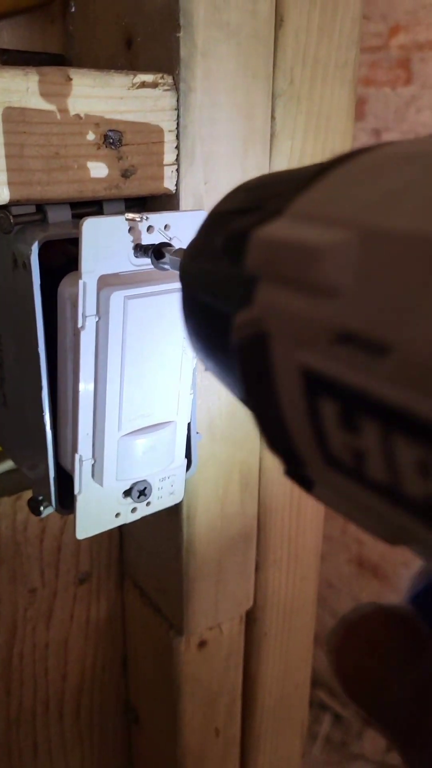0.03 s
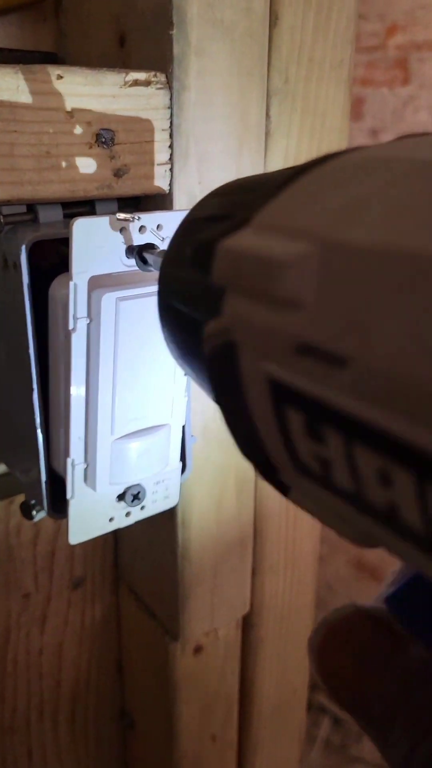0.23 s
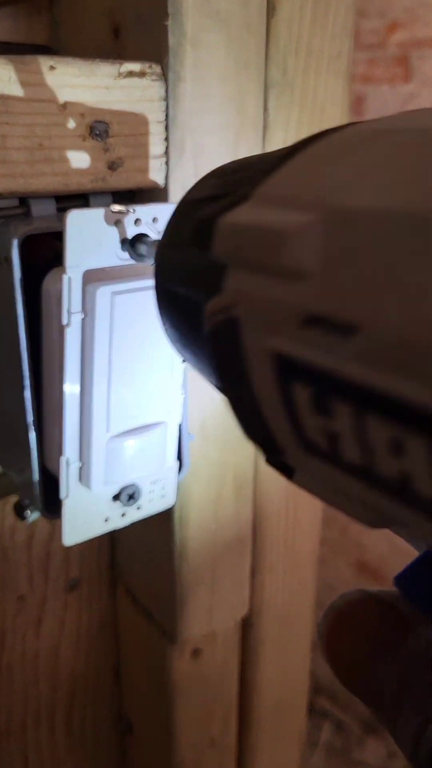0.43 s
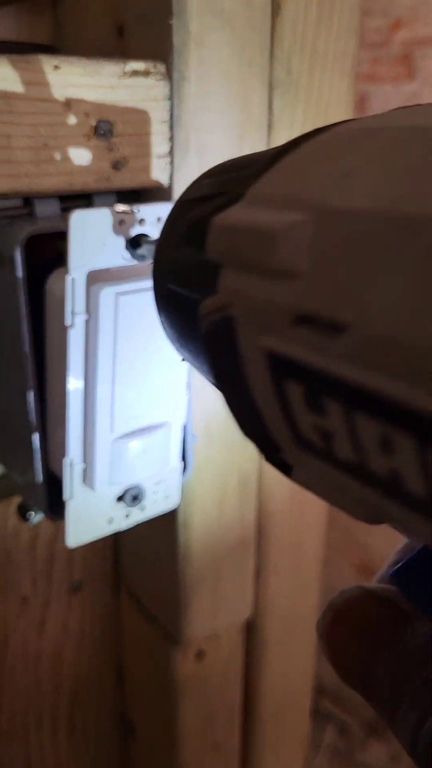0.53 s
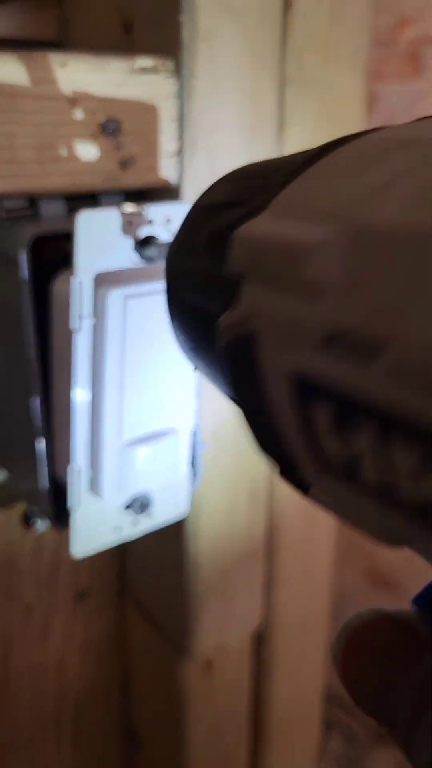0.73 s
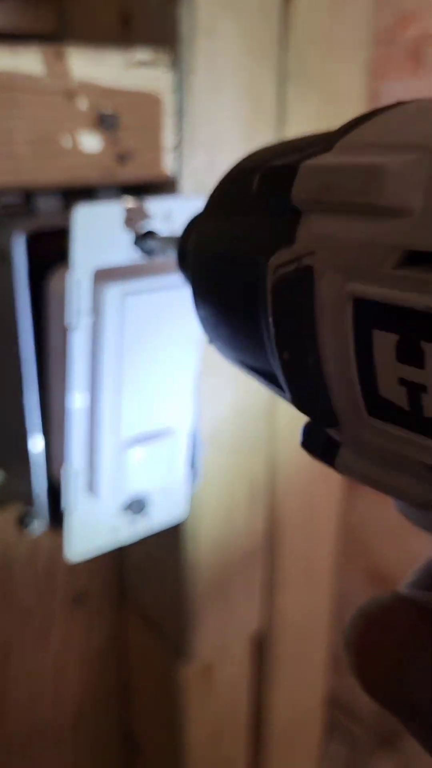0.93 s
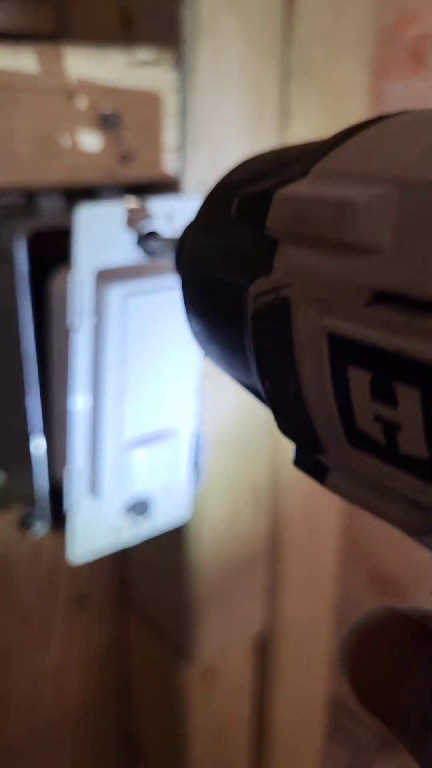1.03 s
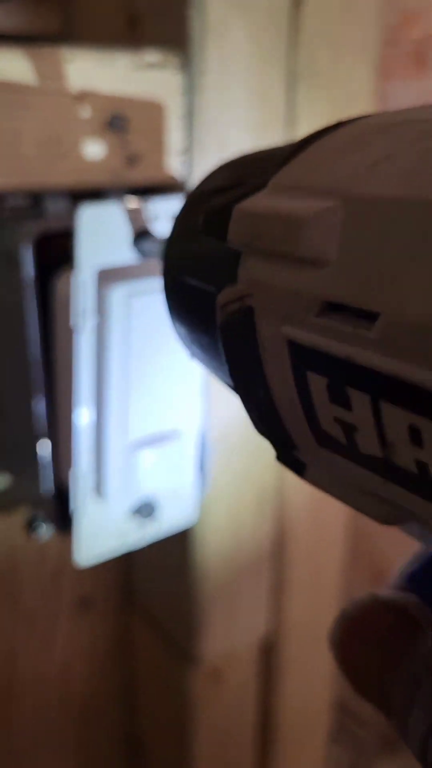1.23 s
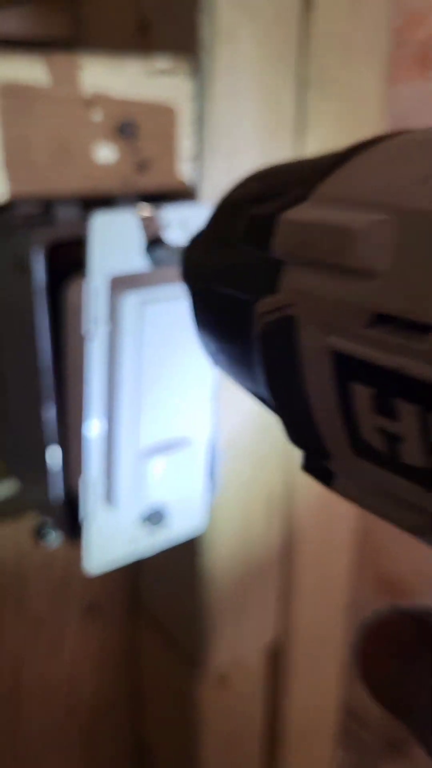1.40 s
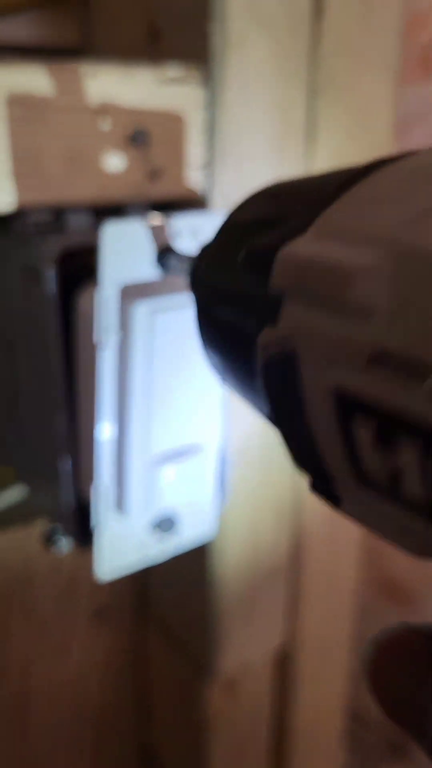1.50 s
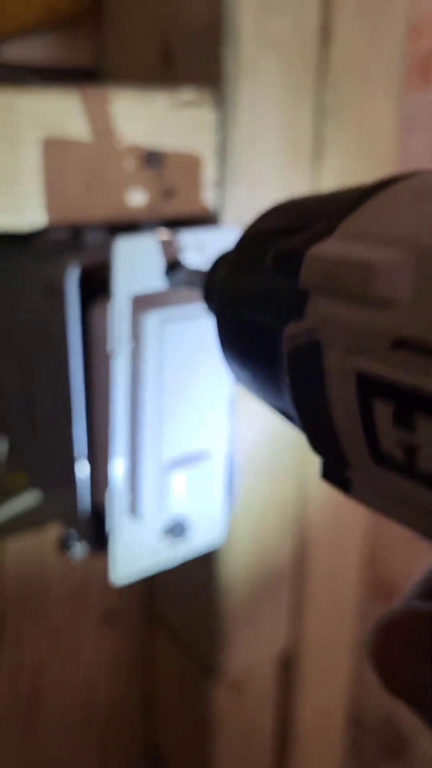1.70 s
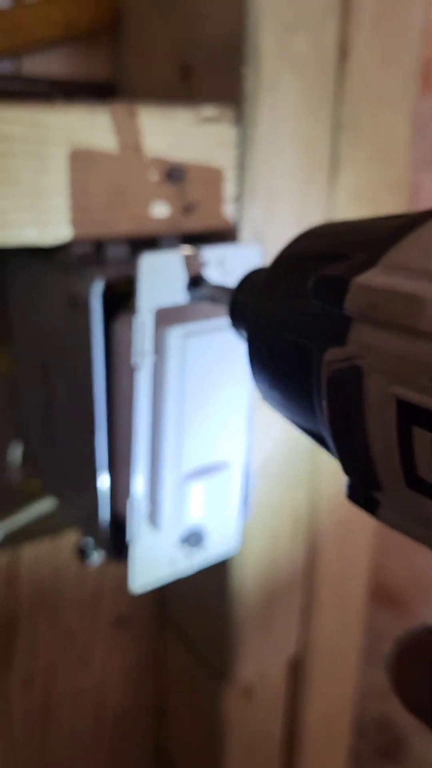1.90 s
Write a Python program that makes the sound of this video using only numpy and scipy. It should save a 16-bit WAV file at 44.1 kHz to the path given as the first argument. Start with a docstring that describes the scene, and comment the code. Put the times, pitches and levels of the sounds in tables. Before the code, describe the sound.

Close cordless drill nudging a screw in brief spurts, clacking and ticking in a timber room.

```python
"""A cordless drill nudges a screw into a wall box, up close in a bare timber room.
On a squeeze of the trigger the speed controller whines, the gears tick through their slack, the spindle
takes hold with a clack, and the motor rasps up to speed and brakes. Some squeezes stop at the clack.
The timber wall answers with dull thuds, and the house rumbles faintly underneath."""
import sys
import numpy as np
from scipy import signal
from scipy.fft import rfft, irfft, next_fast_len
from scipy.io import wavfile
from scipy.ndimage import uniform_filter1d, minimum_filter1d, map_coordinates

SR = 44100
rng = np.random.default_rng(int(sys.argv[2]) if len(sys.argv) > 2 else 0)


def wav_record(signal):
    """Record a signal, one row per channel, as 16-bit PCM in the file named by sys.argv[1]."""
    frames = np.transpose(np.atleast_2d(signal))
    bounded = np.clip(frames, -1, 1)
    # unit amplitude maps onto the largest positive 16-bit level
    quanta = np.round(bounded * 32767).astype(np.int16)
    wavfile.write(sys.argv[1], SR, quanta)


N = 85995


def motor():
    """The motor spins up and brakes: gears knock and grind, the bit rings, the brake jolts the wall."""
    # motor runs: start t/s, top speed t/s, stop t/s, gear pulse rate at the start f/Hz, at the top f/Hz
    runs = [(.160, .257, .294, 120, 726), (.443, .521, .552, 180, 608), (1.112, 1.233, 1.280, 185, 860),
            (1.548, 1.666, 1.707, 145, 572)]
    # loudness of the motor's rasp through each run: t/s, level/dB
    levels = [
        [(.160, -31.5), (.190, -17), (.201, -9), (.236, -20), (.246, -14), (.282, -16.5), (.294, -28.5)],
        [(.443, -23.5), (.468, -22.5), (.502, -16), (.519, -22), (.538, -26.5), (.552, -34)],
        [(1.112, -29), (1.140, -22.5), (1.190, -18), (1.245, -19), (1.262, -28), (1.280, -41.5)],
        [(1.548, -33.5), (1.580, -31), (1.594, -23.5), (1.645, -17.5), (1.688, -22.5), (1.707, -27.5)],
    ]
    # ring of the bit, which seats differently in each run: f/Hz, level/dB
    bit_rings = [(3050, -11), (3030, -9), (4500, -6.5), (2650, -12)]
    # tone colour of the gearbox: f/Hz, level/dB
    gearbox = [(100, -35.5), (350, -14), (620, -20.5), (820, -7), (1080, -3), (1330, -10), (1520, -3),
               (1750, -8.5), (2300, -3), (2900, -4.5), (3500, -3), (4200, -10), (4900, -8.5), (5600, -14),
               (7200, -16.5), (9000, -21.5), (11000, -28.5), (15000, -24.5)]
    stall_hz, grind_db, tilt_db_per_octave = 130, -7, 1.2
    out, jolts, t = np.zeros(N), np.zeros(N), np.arange(N) / SR
    hiss = filtered(rng.standard_normal(N), lambda f: amp(tilt_db_per_octave * np.log2((f + 100) / 3000)))
    for (start, top, stop, start_hz, top_hz), level, (bit_hz, bit_db) in zip(runs, levels, bit_rings):
        running = (t >= start) & (t < stop)
        now = t[running]
        run_up = np.maximum((top - now) / (top - start), 0) ** 1.5
        braking = np.maximum((now - top) / (stop - top), 0) ** 1.8
        pulse_hz = top_hz - (top_hz - start_hz) * run_up - (top_hz - stall_hz) * braking
        cycles = np.cumsum(pulse_hz) / SR
        # sliding teeth: one fading puff of hiss a cycle, louder with speed
        grind = hiss[running] * unit(np.exp(-1.8 * (cycles % 1))) * (pulse_hz / top_hz)
        gears = gear_knocks(cycles, pulse_hz) + amp(grind_db) * grind
        bit = amp(bit_db) * signal.lfilter(*signal.iirpeak(bit_hz, Q=2, fs=SR), gears)
        add(out, start, (gears + bit) * amp(np.interp(now, *np.transpose(level))))
        add(jolts, (top + stop) / 2, amp(-39) * wall_thud(hz=162, t60=0.34, rise_s=0.016))
    rasp = flicker(coloured(out, gearbox))
    return in_room(rasp, room_db=-13, near_db=-1, paths=7) + jolts


def gear_knocks(cycles, pulse_hz, swing=.17, scatter_db=2.6, jitter_s=.000016):
    """Teeth strike once a cycle, every other knock stronger, each a little off in size and time."""
    k = np.arange(1, int(cycles[-1]) + 1)
    samples = np.arange(len(cycles))
    chance = rng.standard_normal((len(k), 2))
    strikes = np.interp(k, cycles, samples) + jitter_s * SR * chance[:, 0]
    size = (1 + swing * (-1) ** k) * amp(scatter_db * chance[:, 1])
    knocks = size @ np.sinc(samples - strikes[:, None]) * np.sqrt(SR / pulse_hz)
    return signal.lfilter(*signal.butter(1, 1210, "high", fs=SR), knocks)  # small teeth radiate few lows


def flicker(x, depth_db=3.5, patch_hz=500, patch_s=.014):
    """Each gear tone swells and fades on its own, in short patches."""
    hz, s, spectra = signal.stft(x, SR, nperseg=256)
    knots = rng.standard_normal((int(hz[-1] / patch_hz) + 2, int(s[-1] / patch_s) + 2))
    grid = np.meshgrid(hz / patch_hz, s / patch_s, indexing="ij")
    gain = amp(depth_db * map_coordinates(knots, grid))
    return signal.istft(spectra * unit(gain), SR, nperseg=256)[1][:N]


def spindle_clacks(hold_s=0.0026, snap_db=-1, snap_t60=0.0088, thud_db=-9.5):
    """The spindle slams home: a bright snap, steel clatter, the housing's ring and a thud in the wall."""
    # clacks: t/s, level/dB, ring level/dB, room level/dB, ring tuning/ratio, clatter t60/s
    hits = [(-.030, -19.5, -9, -1, 0.9, 0.075), (.158, -20.5, -5.5, -2.5, 0.98, 0.19),
            (.440, -22.5, -8.5, -0.5, 0.96, 0.23), (.787, -21, -6.5, -3.5, 1, 0.14),
            (1.1098, -22, -5, -2, .98, .11), (1.540, -21.5, -1, -2, 1, 0.03)]
    # tone colour of the steel clatter: f/Hz, level/dB
    steel = [(80, -20.5), (220, -8.5), (550, -10), (850, -3.5), (1500, -6.5), (2200, -3), (4600, -3),
             (6000, -9), (7700, -6.5), (10000, -14), (15000, -10)]
    # housing modes, before each clack's tuning: f/Hz, level/dB, t60/s
    housing = [(815.7, 2, 0.088), (2071, 9.5, 0.023), (2288, 11, 0.023), (3423, 15.5, .02),
               (4637, 4, 0.023), (7820, 3.5, 0.018)]
    out, t = np.zeros((2, N)), np.arange(N) / SR
    for s, db, ring_db, room_db, tuning, clatter_t60 in hits:
        decay = amp(-60 * np.maximum(t - hold_s, 0) / clatter_t60)
        clatter = coloured(rng.standard_normal(N) * decay, steel)
        snap = np.diff(rng.standard_normal(N + 1)) * amp(snap_db - 60 * t / snap_t60)
        ring = sum(amp(level - 60 * t / t60) * np.sin(2 * np.pi * hz * tuning * t)
                   for hz, level, t60 in housing)
        ring *= 1 - np.exp(-t / 0.0005)
        wall = amp(room_db + thud_db) * wall_thud(hz=205, t60=0.37, rise_s=0.04)
        clack = in_room(snap + clatter + amp(ring_db) * ring, room_db, near_db=0)
        add(out, s, amp(db) * (clack + wall))
    return out


def gear_ticks():
    """Teeth and bit tick through their slack."""
    # ticks: t/s, level/dB
    hits = [(.138, -15), (.149, -8), (.291, -10.5), (.3285, -17), (.342, -20), (.3975, -4.5), (.413, -14),
            (.4207, -8.5), (.4273, -5.5), (.4332, -8), (.7222, -22.5), (.7367, -22.5), (.7513, -17.5),
            (.7697, -20), (1.087, -25), (1.097, -14.5), (1.105, -8.5), (1.495, -26.5), (1.5116, -19),
            (1.526, -21), (1.747, -17.5)]
    # tone colour of a tick: f/Hz, level/dB
    colour = [(150, -14), (550, -14.5), (850, -7.5), (1800, -8), (3000, -2), (3900, -6.5), (5000, -5.5),
              (7000, -22), (10000, -34), (16000, -40)]
    return contacts(hits, colour)


def trigger_clicks():
    """The trigger switch clicks under the finger."""
    # clicks: t/s, level/dB
    hits = [(.112, -20), (1.059, -32.5), (1.437, -37)]
    # tone colour of the switch: f/Hz, level/dB
    colour = [(200, -14.5), (900, -6), (2000, -7), (6000, -8), (9000, -23), (15000, -19.5)]
    return contacts(hits, colour)


def contacts(hits, colour, rattle_db=-10.5, rattle_t60=0.0043, bright_above_db=-13):
    """Small hard contacts, each with a short rattle behind it; the hardest hits are brighter."""
    out, t = np.zeros(N), np.arange(SR // 30) / SR
    centre = len(t) // 2
    octaves = np.log2(np.clip(np.fft.rfftfreq(len(t), 1 / SR), 500, 6000) / 3000)
    for s, db in hits:
        rattle = amp(rattle_db - 60 * t / rattle_t60) * rng.standard_normal(len(t))
        contact = np.roll((t == 0) + rattle, centre)
        tilt_db_per_octave = 0.16 * max(db - bright_above_db, 0)
        add(out, s - t[centre], amp(db) * irfft(rfft(contact) * amp(tilt_db_per_octave * octaves)))
    return in_room(coloured(out, colour), room_db=-11, near_db=-6, paths=3)


def controller_whine(hz=6010, octave_db=-9, waver_db=3.5, waver_hz=160, slip_rad=.7):
    """The switched current sings unsteadily in the stalled motor until it breaks loose."""
    # whines: start t/s, end t/s, level/dB
    whines = [(0.115, 0.164, -43), (0.378, 0.445, -46), (0.694, .790, -49), (1.07, 1.116, -49),
              (1.471, 1.542, -54.5)]
    t = np.arange(N) / SR
    gates = sum(amp(db) * ((t > start) & (t < end)) for start, end, db in whines)
    stereo_phase = np.array([[0], [np.pi / 2]])
    phase = 2 * np.pi * hz * t + slip_rad * wobble(waver_hz) + stereo_phase
    tone = np.sin(phase) + amp(octave_db) * np.sin(2 * phase)
    return uniform_filter1d(gates, size=180) * tone * amp(waver_db * wobble(waver_hz))


def wall_thud(hz, t60, rise_s):
    """The timber wall booms: a low band of noise that swells and dies away."""
    t = np.arange(N) / SR
    boom = unit(filtered(rng.standard_normal(N), lambda f: 1 / (1 + (2.1 * np.log((f + 1) / hz)) ** 4)))
    return boom * amp(-60 * t / t60) * (1 - np.exp(-t / rise_s))


def in_room(x, room_db, near_db, paths=1, shift_s=.017, near_t60=0.026):
    """Direct sound, scatter off nearby studs and room tail; several paths crossfade as the chuck turns."""
    # phase lead of the left channel: f/Hz, lead/rad
    lead = [(100, -2), (1200, 0.23), (2410, 3.5), (2840, -0.7), (4220, -5.5), (5940, -9.5), (7750, 4.5),
            (11400, 18.5), (16500, 21.5)]
    # stereo balance, left minus right: f/Hz, level/dB
    pan = [(80, 0), (140, -5.5), (210, 7.5), (330, -12), (500, -8), (770, 6.5), (1170, 0.5), (1790, -6),
           (2740, -8), (4190, -4.5), (6410, 8), (9810, -1.5), (15000, -1)]
    # decay of the timber room: f/Hz, t60/s
    room_decay = [(150, 0.39), (450, 0.58), (850, 0.36), (1300, 0.39), (4500, 0.28), (8000, 0.3),
                  (15000, 0.16)]
    t, sides = np.arange(SR // 20) / SR, np.array([[1], [-1]])
    scatter, room = 0, 0
    for k in range(paths):
        away = abs((np.arange(N) / SR / shift_s - k + paths / 2) % paths - paths / 2)
        part = x * np.cos(np.pi / 2 * np.minimum(away, 1)) if paths > 1 else x
        studs = rng.standard_normal((2, len(t))) * amp(-60 * t / near_t60) * (1 - np.exp(-t * 2000))
        hz, s, noise = signal.stft(rng.standard_normal((2, SR // 2)), SR, nperseg=256)
        tail = signal.istft(noise * amp(-60 * s / along(room_decay, hz)[:, None]), SR, nperseg=256)[1]
        scatter += echo(part, studs)
        room += echo(part, tail)
    direct = filtered(x, lambda f: np.exp(.5j * along(lead, f) * sides))
    close = filtered(direct + amp(near_db) * scatter, lambda f: amp(sides * along(pan, f) / 2))
    return close + amp(room_db) * room


def house_rumble(level_db=-55.5, side_db=-11):
    """Low rumble of the house, nearly the same on both sides."""
    # tone colour of the rumble: f/Hz, level/dB
    colour = [(20, -25), (40, -2), (54, 7.5), (75, -15.5), (100, 2.5), (125, -8.5), (300, -22.5),
              (1000, -31), (3000, -30.5), (8000, -53), (16000, -44.5)]
    mid, side = (coloured(rng.standard_normal(N), colour) for _ in range(2))
    return amp(level_db) * (mid + amp(side_db) * np.array([side, -side]))


def amp(db):
    """Decibels to gain."""
    return 10 ** (np.asarray(db) / 20)


def unit(x):
    """Scale to rms 1."""
    return x / np.sqrt(np.mean(x ** 2) + 1e-20)


def along(points, hz):
    """Read a curve of (f/Hz, value) points on a log frequency axis."""
    f, values = np.transpose(points)
    return np.interp(np.log(hz + 1), np.log(f + 1), values)


def filtered(x, response):
    """Shape x with a complex frequency response."""
    size = next_fast_len(N + SR // 2)
    return irfft(rfft(x, size) * response(np.fft.rfftfreq(size, 1 / SR)), size)[..., :N]


def coloured(x, points, size=4096):
    """Give x a tone colour with a minimum-phase filter of unit energy."""
    cepstrum = irfft(np.log(amp(along(points, np.fft.rfftfreq(size, 1 / SR)))))
    cepstrum[1:size // 2] *= 2
    cepstrum[size // 2 + 1:] = 0
    impulse = irfft(np.exp(rfft(cepstrum)))
    return signal.fftconvolve(x, impulse / np.linalg.norm(impulse))[:len(x)]


def echo(x, impulse):
    """Play x through a stereo impulse response, scaled to unit energy on the left."""
    return signal.oaconvolve(x[None], impulse / np.linalg.norm(impulse[0]), axes=1)[:, :N]


def wobble(rate):
    """A smooth random curve for each channel, rate knots a second."""
    knots = rng.standard_normal((2, int(N * rate / SR) + 4))
    return np.array([map_coordinates(row, [np.arange(N) * rate / SR]) for row in knots])


def add(track, s, x):
    """Mix x into the track at time s."""
    i = round(s * SR)
    part = x[..., max(-i, 0):N - i]
    track[..., max(i, 0):max(i, 0) + part.shape[-1]] += part


def scene():
    """The drill over the quiet of the room."""
    return motor() + spindle_clacks() + gear_ticks() + trigger_clicks() + controller_whine() + house_rumble()


def record(dry, ceiling=.89, hold_s=.004, top_hz=15800):
    """A limiter ducks the highest peaks, then a steep low-pass trims the top."""
    hold = round(hold_s * SR)
    gain = ceiling / np.maximum(abs(dry).max(axis=0), ceiling)
    limited = dry * uniform_filter1d(minimum_filter1d(gain, hold), hold // 2)
    return signal.sosfilt(signal.ellip(10, .2, 90, top_hz, fs=SR, output="sos"), limited)


dry = scene()
out = record(dry)
wav_record(out)
```